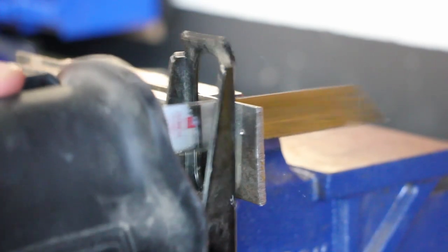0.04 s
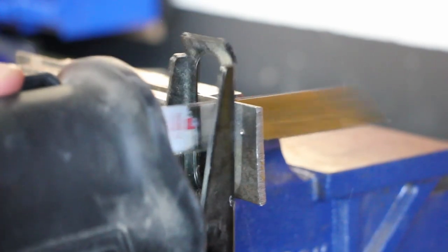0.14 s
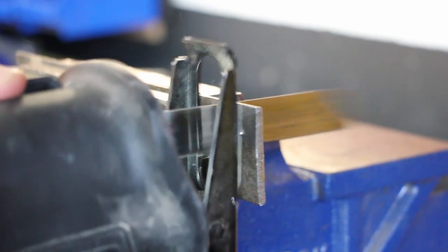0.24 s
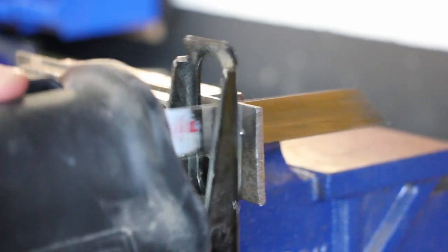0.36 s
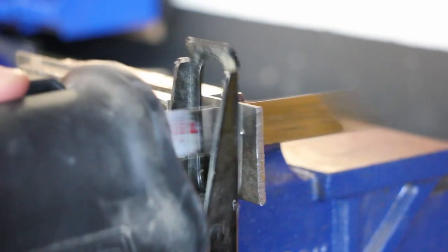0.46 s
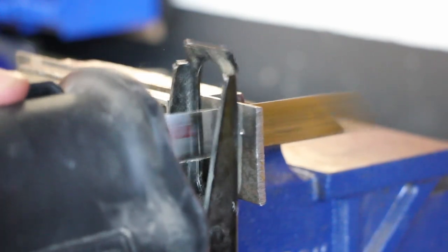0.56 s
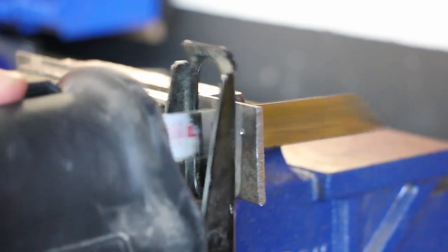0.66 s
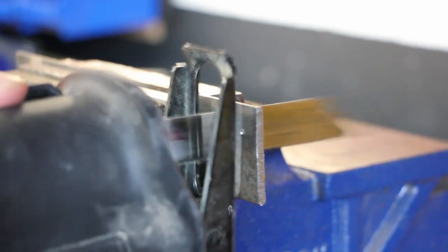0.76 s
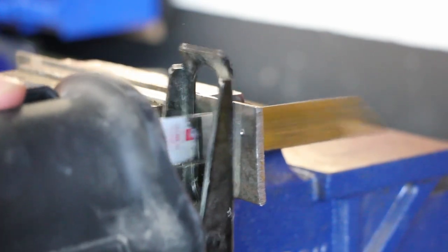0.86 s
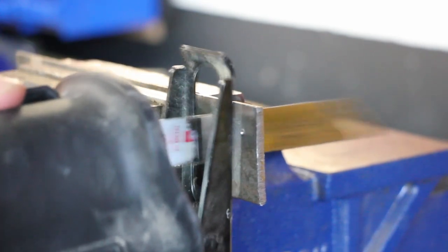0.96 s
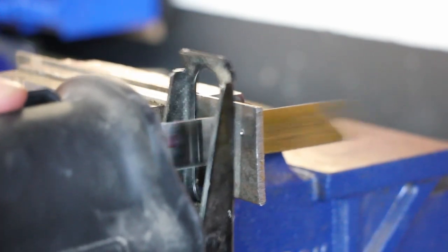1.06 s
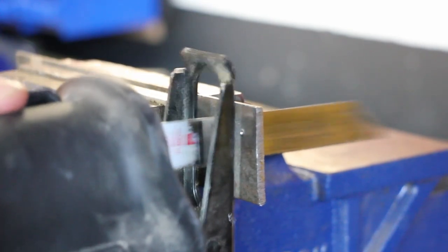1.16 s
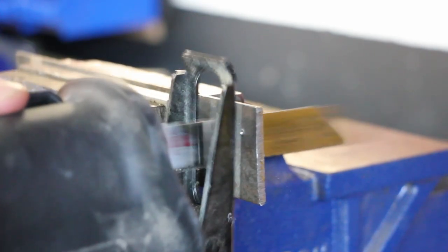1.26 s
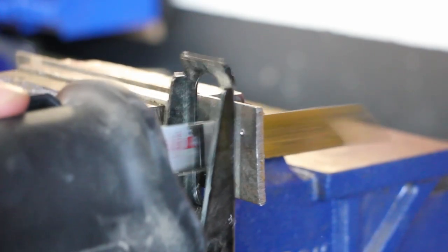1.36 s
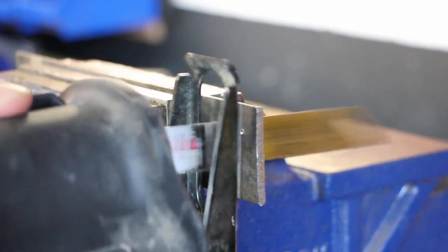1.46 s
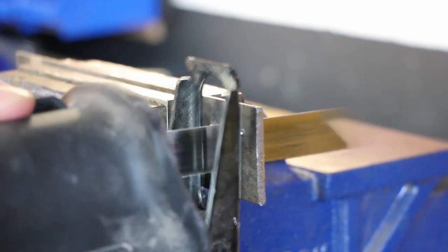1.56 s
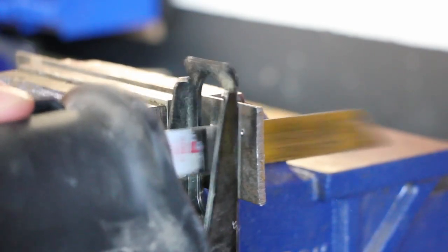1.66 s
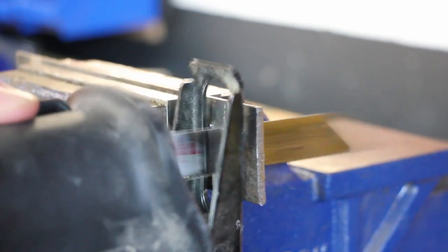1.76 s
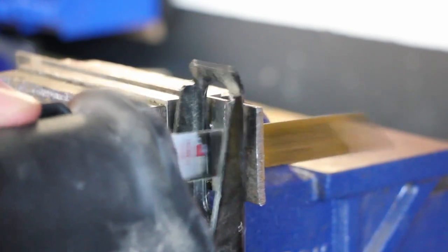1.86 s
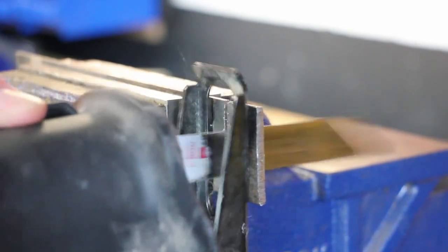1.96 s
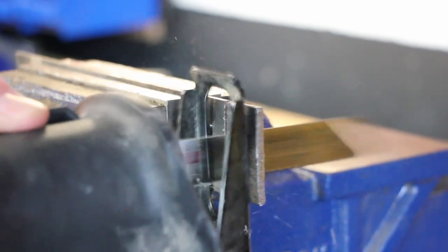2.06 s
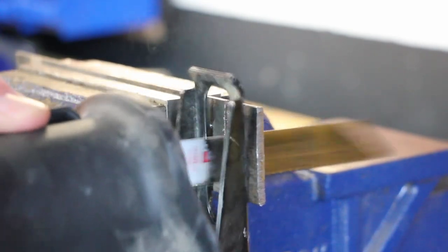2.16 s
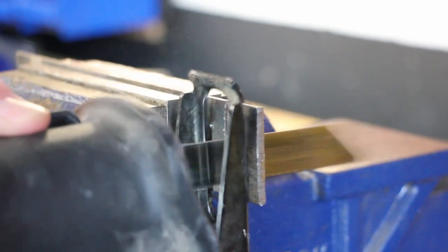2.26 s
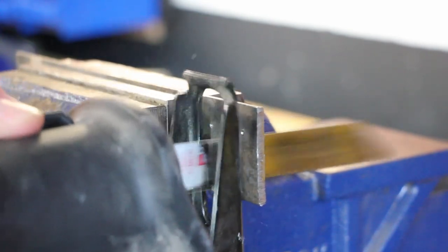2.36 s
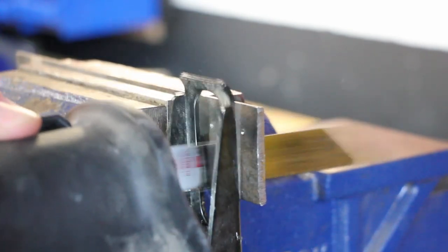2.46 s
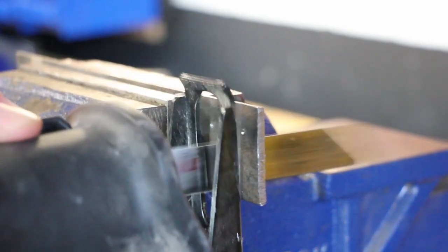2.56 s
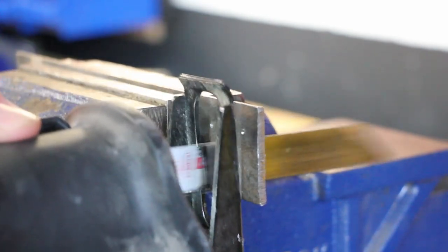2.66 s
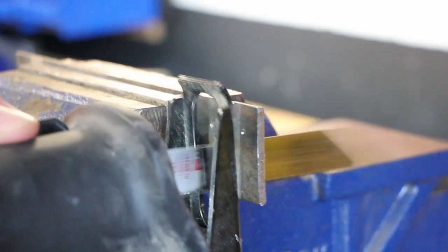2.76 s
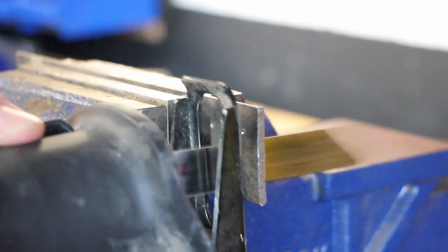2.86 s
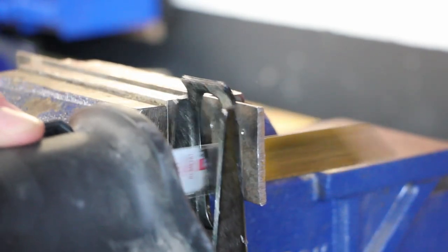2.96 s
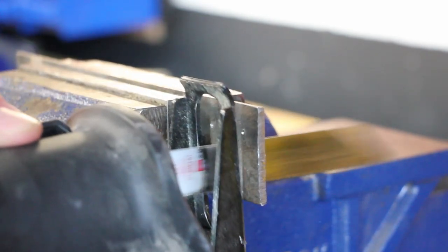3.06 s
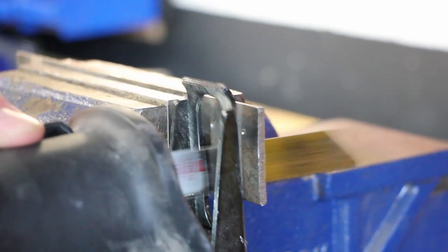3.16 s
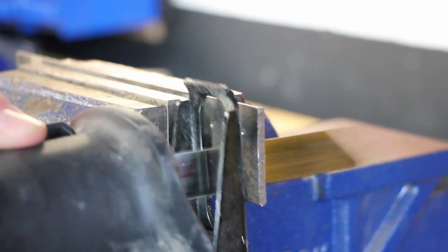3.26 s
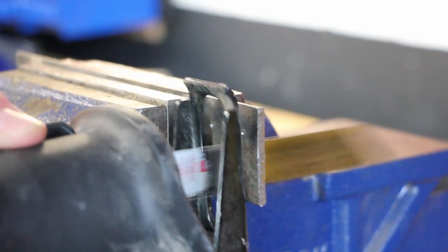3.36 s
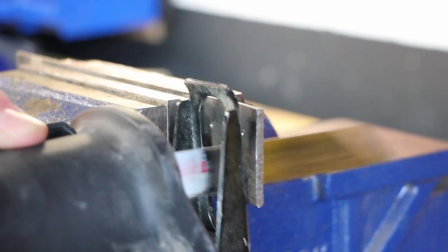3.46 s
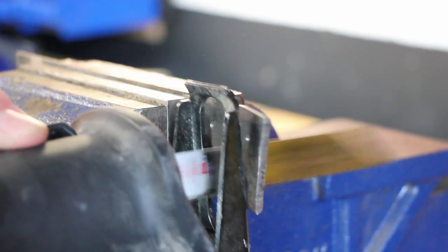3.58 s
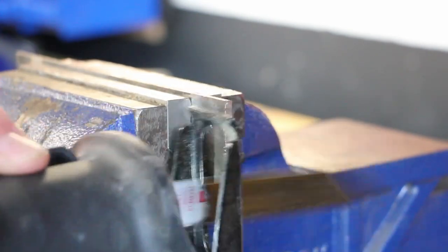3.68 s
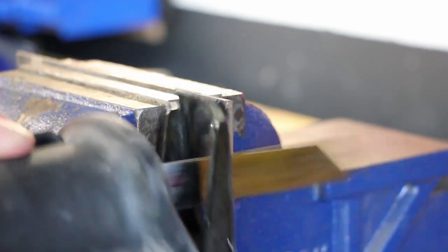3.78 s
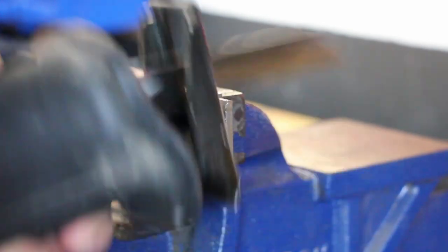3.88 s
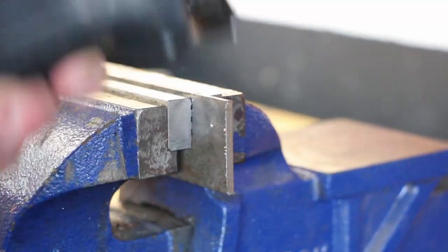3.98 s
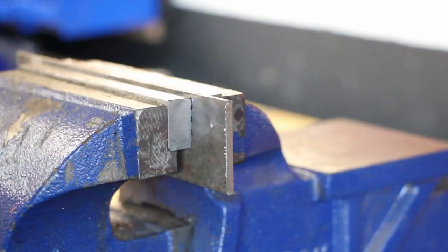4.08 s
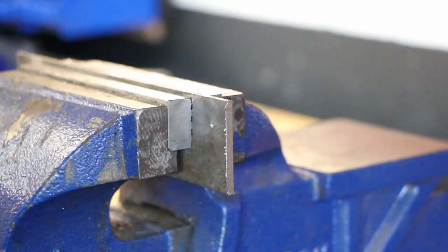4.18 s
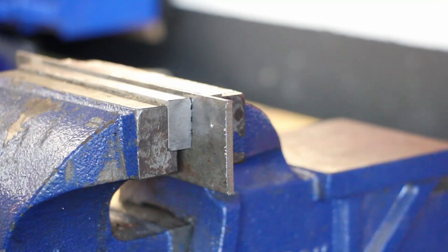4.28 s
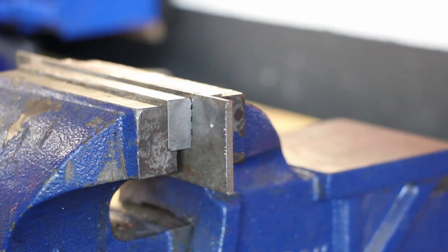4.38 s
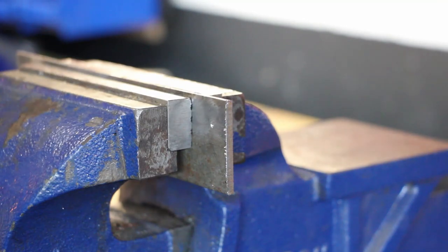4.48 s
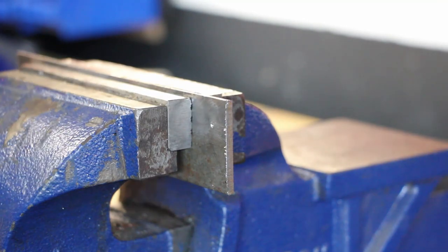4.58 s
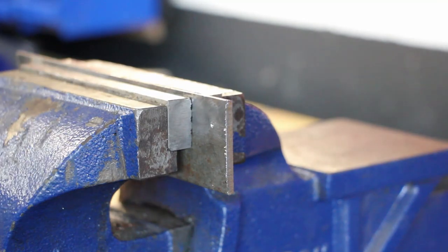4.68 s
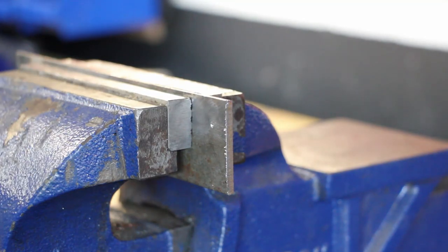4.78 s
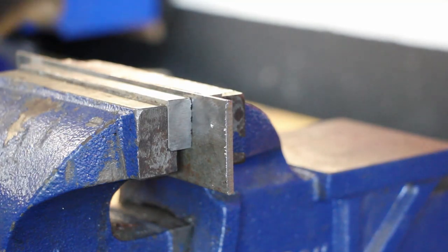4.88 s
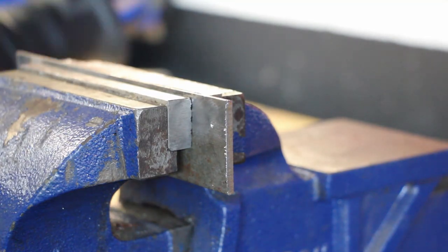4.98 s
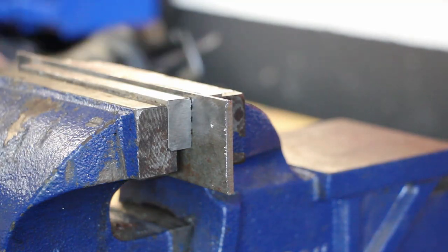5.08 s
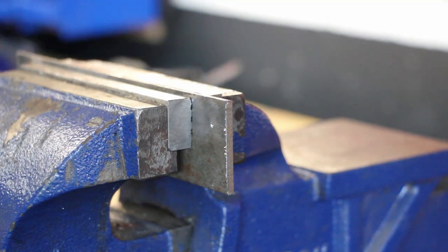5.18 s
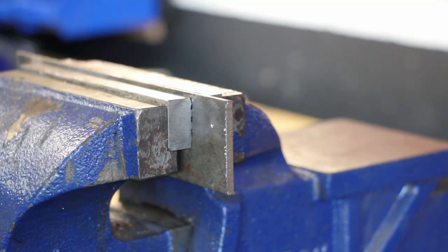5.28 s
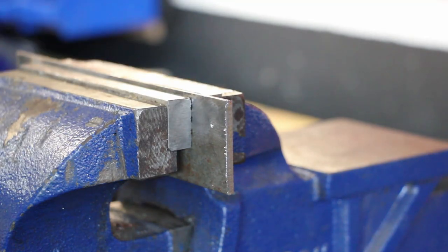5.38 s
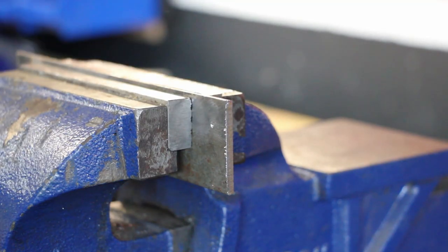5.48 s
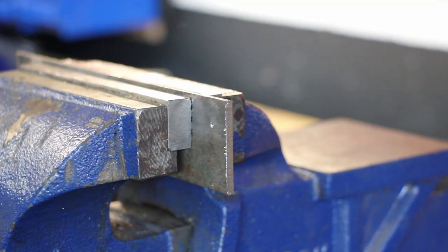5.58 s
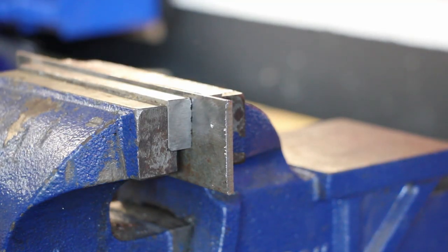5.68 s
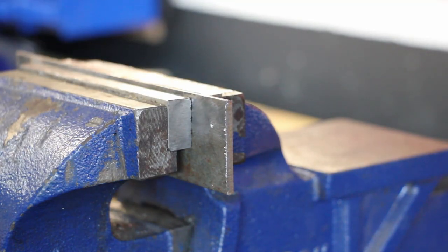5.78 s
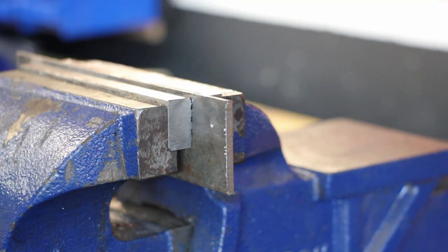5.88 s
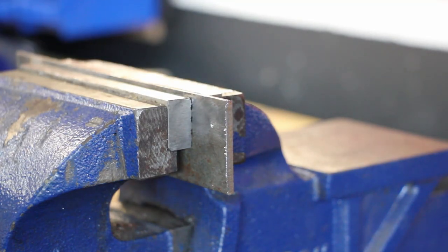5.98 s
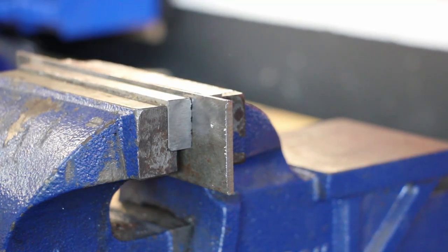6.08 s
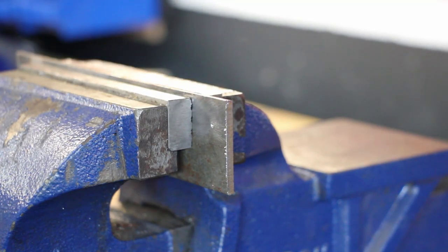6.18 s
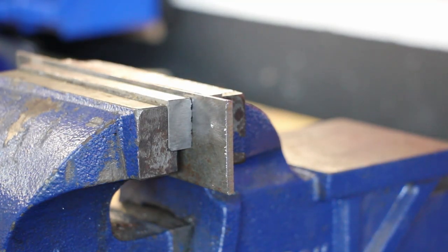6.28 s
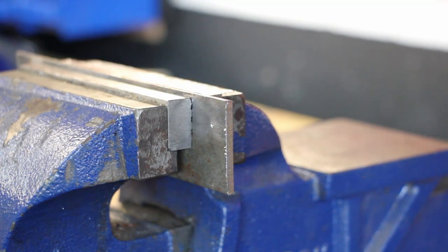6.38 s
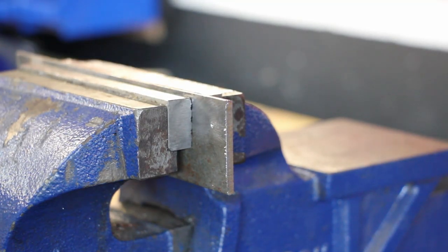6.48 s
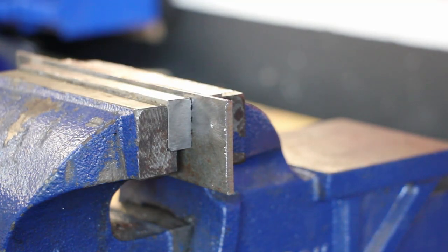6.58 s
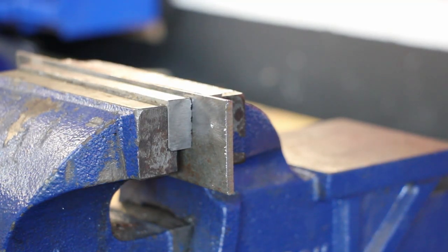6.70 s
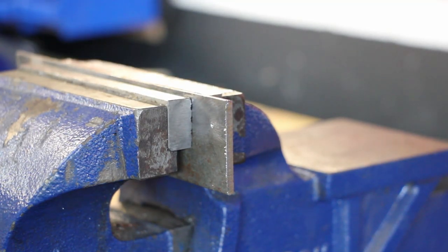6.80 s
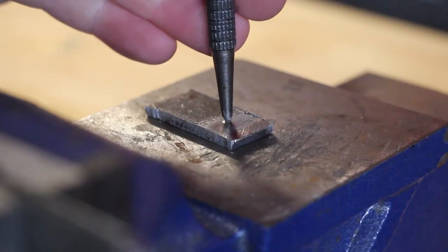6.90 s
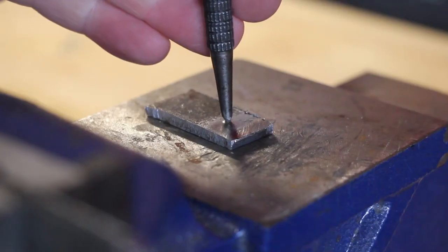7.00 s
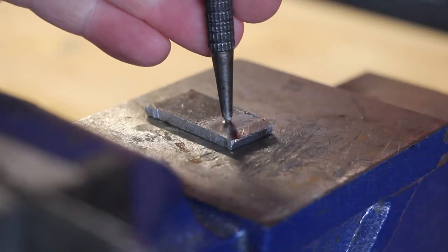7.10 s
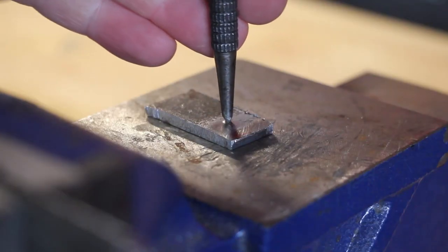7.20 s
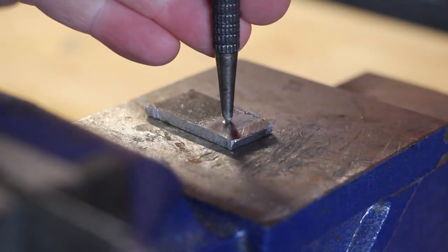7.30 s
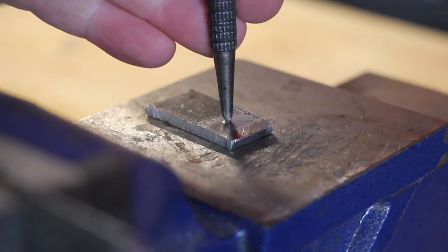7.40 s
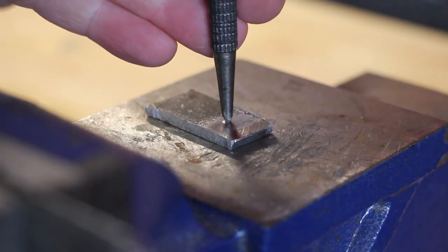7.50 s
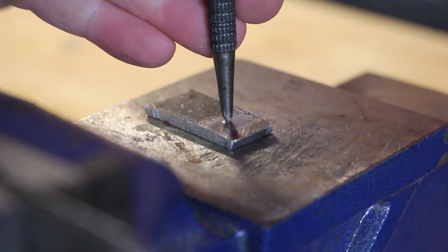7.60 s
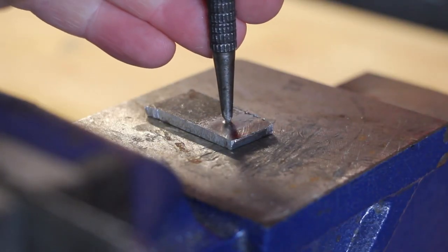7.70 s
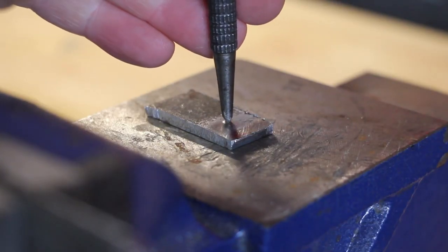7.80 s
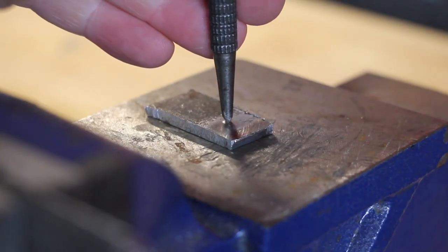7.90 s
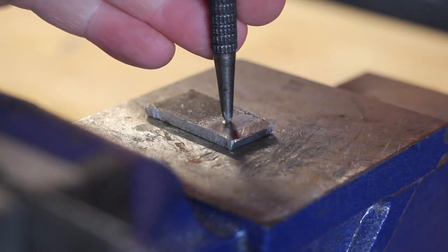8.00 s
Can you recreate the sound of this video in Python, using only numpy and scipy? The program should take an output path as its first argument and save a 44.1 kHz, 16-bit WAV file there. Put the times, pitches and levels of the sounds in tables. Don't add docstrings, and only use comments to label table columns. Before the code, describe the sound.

From 0 to about 3.7 seconds a reciprocating saw cuts steel in a vise, a dense, harsh roar pulsing around 36 strokes a second and flattened by microphone overload. Plate and jaw ring metallically, their pitches sagging as the cut deepens; thin squeaks chirp near 2 seconds and low bench shudder grows after it. Around 3.6 the offcut breaks free with high pings, then hits the floor at 4.2 with a bright clatter and small bounces. Meanwhile the motor coasts down, its gear whine falling through slowing crank clacks and raspy brushes until about 5.6. The tool meets the bench from 5.2 with thuds and a short singing ring; more thuds and scuffs follow at 6.05, 6.3 and 6.7. Garage air, faint hum and hiss come up, jumping at 6.85, as a drill press rattle grows until 8, with faint slides at 7.2 and 7.9.

```python
import sys
import numpy as np
from scipy import signal
from scipy.fft import rfft, irfft, next_fast_len
from scipy.io import wavfile
from scipy.ndimage import uniform_filter1d

SR = 44100
rng = np.random.default_rng(int(sys.argv[2]) if len(sys.argv) > 2 else 0)


def dump(signal):
    limited = np.clip(np.atleast_2d(signal).T, -1, 1)
    pcm = np.round(limited * 32767).astype(np.int16)
    wavfile.write(sys.argv[1], SR, pcm)


def makeup_ratio(level_db):
    decades = np.asarray(level_db, float) / 20
    return 10 ** decades


N = 355005
T = np.arange(N) / SR

# freq_hz, density_db
AIR_SPECTRUM = [(12, -32), (20, -2), (32, -14), (124, -16), (244, -25), (280, -24), (651, -31.5),
                (708, -29), (965, -28.5), (1170, -28), (1280, -33), (2000, -32.5), (15100, -52),
                (16500, -61)]
# time_s, level_db
AIR_LEVEL = [(5.6, -89), (5.8, -54.5), (6.11, -40), (6.45, -45), (6.71, -43.5), (7.77, -44.5),
             (8.05, -41.5)]
# freq_hz, width_hz, level_db
AIR_PEAK = (3500, 580, -20)
# freq_hz, level_db
HUM_TONES = [(59.2, -62), (118.4, -51), (721.4, -58)]
# freq_hz, width_hz, level_db
PRESS_MODES = [(373, 49, 3.5), (237, 36, -4.5), (1133, 27, -8), (1185, 39, -13), (1980, 47, -14),
               (2100, 60, -21), (3050, 150, -12.5), (3700, 110, -19)]
# time_s, level_db
PRESS_LEVEL = [(6.85, -60), (7.2, -52.5), (7.5, -43), (7.75, -43.5), (8.05, -38)]
# time_s, share_of_full
INPUT_GAIN = [(0, .02), (4.5, .02), (5.25, .06), (5.75, .22), (6.0, .36), (6.25, .44), (6.85, .46),
              (6.86, 1), (8.05, 1)]

# peak_s, level_db, rise_s, t60_s, tilt_db_per_octave
SCUFF_EVENTS = [
    (4.21, -13.5, 0.019, 0.15, 0),
    (4.245, -34, 0.0052, 0.088, 3),
    (6.055, -48, 0.043, 0.38, 2.5),
    (6.21, -41, 0.031, 0.18, -1),
    (6.34, -26, 0.047, 0.25, 0),
    (6.8, -48, 0.095, 0.24, 3.5),
    (7.19, -49, .03, .1, 3),
    (7.87, -39, 0.037, 0.25, -0.5),
    (7.916, -44, .001, .02, 6),
]
# freq_hz, density_db
SCUFF_SPECTRUM = [(120, -39), (200, -7), (241, -7), (459, -7), (741, -11.5), (1030, -5), (1390, -5),
                  (2160, -16.5), (3620, -4), (5440, -15.5), (14200, -24), (15600, -37), (16500, -47)]
# freq_hz, width_hz, level_db
LANDING_MODES = [(2174, 33, 7), (3700, 47, -0.5), (4310, 31, -3), (4750, 150, 0)]
# start_s, then level_db of the modes near 75, 140, 450, 1200 Hz
THUD_EVENTS = [(5.218, -26.5, -26, -26.5, -28), (5.305, -32, -34, -28, -34), (5.335, -32, -30, -40, -29),
               (5.441, -42.5, -41, -29.5, -40), (5.56, -44.5, -49, -25.5, -28),
               (6.05, -38, -28.5, -24.5, -30.5), (6.075, -41.5, -29, -29.5, -50),
               (6.335, -33, -33.5, -41, -40), (6.664, -26, -25.5, -22, -36.5), (6.74, -29.5, -35, -38, -52),
               (7.195, -37, -44, -59, -66)]
# freq_hz, t60_s
BENCH_MODES = [
    [(72, 0.34)],
    [(125, 0.14), (160, 0.12), (250, 0.11)],
    [(375, 0.072), (445, 0.11), (500, 0.13)],
    [(720, 0.072), (1150, 0.061), (1370, 0.066), (1820, 0.067), (2350, 0.037)],
]
# freq_hz, t60_s
OFFCUT_MODES = [(11620, 0.17), (11690, 0.17), (13790, 0.26), (13860, .15)]
# start_s, low_pair_db, high_pair_db
PING_EVENTS = [
    (3.585, -32, -45),
    (3.611, -26, -40),
    (3.628, -29, -22),
    (4.197, -32, -38),
    (4.241, -25, -42),
    (4.3, -34, -43),
    (4.47, -48, -55),
]
# start_s, level_db, pitch_hz
SQUEAK_EVENTS = [(1.95, -14, 12700), (2.004, -9, 12200), (2.032, -17, 12300), (2.063, -16, 12300),
                 (2.0904, -19, 12100), (2.1196, -16, 12400), (2.147, -11.5, 12200), (2.177, -22, 12500),
                 (2.2049, -14, 12400)]

# stroke_multiple, level_db
SHAKE_ORDERS = [(1, -74), (2, -46), (3, -48.5), (4, -63), (5, -52), (6, -44.5), (8, -50)]
# time_s, level_db
SHAKE_LEVEL = [(0, 4), (2.2, 8.5), (2.7, 17.5), (3.65, 18.5), (3.75, -28)]
# start_s, level_db
HEAVY_CLACKS = [(4.141, -11), (4.206, -4), (4.393, -18), (4.566, -16), (4.702, -14), (5.118, -21),
                (5.32, -13), (5.522, -22), (5.561, -19)]
# freq_hz, level_db, t60_s
HOUSING_MODES = [(1040, -13, 0.022), (1490, 2.5, 0.029), (1890, 4.5, 0.023), (2470, -5, 0.021),
                 (3520, 3, 0.013)]
# freq_hz, width_hz, level_db
BRUSH_MODES = [(6300, 440, -4), (7400, 460, 0), (8130, 500, 4), (9570, 500, 2), (11600, 600, -7),
               (13800, 1400, -22)]
# freq_hz, level_db
WHINE_RESPONSE = [(1200, -70), (2200, -47), (3100, -40.5), (3900, -29.5), (4300, -35.5), (4800, -31),
                  (6900, -34), (8000, -40)]
# mesh_multiple, level_db
GEAR_ORDERS = [(1, 6), (2.3, -9), (0.6, 0), (3, -14), (1.47, -7), (2.7, -9)]

# time_s, strokes_done
BLADE_STROKES = [(0, -0.42), (0.1, 3.23), (0.45, 15.91), (0.8, 28.63), (1.15, 41.25), (1.5, 53.75),
                 (1.85, 66.27), (2.2, 78.73), (2.55, 91.38), (2.9, 104.24), (3.25, 117.39), (3.6, 130.67)]
# start_s, end_s, first_hz, last_hz, level_db
TAB_MODES = [(0, 0.735, 990, 964, -25.5), (0.3, 1.8, 876, 860, -29), (1.7, 2.13, 845, 720, -32),
             (0.45, 1.52, 2086, 1840, -27), (1.4, 2.26, 1800, 1566, -25), (2.2, 2.7, 1390, 1373, -21.5),
             (2.6, 3.2, 1384, 1340, -26.5), (0, 1.6, 3700, 3600, -27.5), (1.45, 2.09, 3640, 3270, -20.5),
             (1.95, 2.595, 3080, 3000, -25.5), (2.43, 2.9, 2670, 2640, -25), (0, 0.67, 4620, 4540, -26.5),
             (0.5, 1.03, 4000, 4330, -29.5), (1.0, 1.82, 4620, 4560, -31), (0, 0.53, 5580, 5540, -28),
             (3.0, 3.66, 2430, 2360, -25.5), (2.88, 3.66, 3500, 3440, -27.5)]
# freq_hz, width_hz, level_db, start_s, end_s
JAW_MODES = [(1663, 32, -33, 0, 0.99), (1874, 46, -29.5, 0, 1.26), (2634, 49, -32.5, 0, 3.72),
             (3022, 72, -33, 0.054, 3.83), (3374, 41, -31, 0.59, 2.98)]
# time_s, level_db
SAW_LEVEL = [(0.0, -18.5), (1.47, -18.5), (2.19, -19), (2.35, -17.5), (2.99, -18.5), (3.59, -18.5),
             (3.66, -20), (3.78, -18.5), (4.03, -21.5), (4.21, -23.5), (4.4, -26), (4.6, -32),
             (5.16, -30.5), (5.3, -29), (5.6, -29.5), (5.88, -40), (6.0, -66), (6.03, -88)]
# freq_hz, density_db
CUTTING_SPECTRUM = [(15, -46), (25, -29), (100, -5.5), (251, -11), (348, -5), (433, -9.5), (1060, 0),
                    (1470, -2), (1640, 2), (2820, -4.5), (3600, 1), (4350, -3), (15200, -12.5),
                    (16500, -56)]
# freq_hz, density_db
COASTING_SPECTRUM = [(15, -68), (25, -40), (202, -14), (321, -8.5), (1180, 0), (1980, -4.5), (3700, -3),
                     (4350, -6.5), (5710, -8.5), (14000, -26.5), (15200, -33), (16500, -61)]
# freq_hz, density_db
STOPPING_SPECTRUM = [(15, -37), (25, -9), (76, -6), (186, -21), (288, -7), (496, -1), (599, -8),
                     (808, -2.5), (3500, -4), (13600, -20), (15200, -27), (16500, -49)]
# time_s, stage (0 cutting, 1 coasting, 2 stopping)
SAW_STAGE = [(0, 0), (3.62, 0), (3.72, 1), (4.2, 1), (4.7, 2)]

FREE_S, DOWN_S = 3.72, 5.215
MESH_HZ, RELEASE_S, DRAG_S, FRICTION_HZ_PER_S = 8000, 3.74, 0.95, 2450
MESH_PER_SHAFT, MESH_PER_REVERSAL, REVERSAL_LEAD = 24.4, 107, 0.255
CLACK_DB, CLACK_DB_PER_OCTAVE, CLACK_SPREAD_DB = -12.5, 4, 3
BRUSH_DB, BRUSH_RINGING_DB, BRUSH_SHARP, BRUSH_ODD = -42.5, -1.5, 0.54, 0.3
BRUSH_IN_S, BRUSH_FULL_S, BRUSH_OUT_S, BRUSH_RISE_DB, BRUSH_FALL_DB_PER_S = 4.3, 4.94, 5.5, 14, 60
WHINE_FROM_S, WHINE_DB_PER_OCTAVE = 3.3, 2.5
SHOE_HZ, SHOE_T60_S, SHOE_DB, SHOE_UNTIL_S = 522.7, 0.72, -4.5, 5.9
TAB_WIDTH_HZ, TAB_WIDTH_HZ_PER_KHZ, TAB_FADE = 37, 12, 0.35
BODY_DB, TREBLE_DB, TREBLE_DB_PER_OCTAVE = -3, -12.5, 8.5
BASS_DB, LIFTED_DB, BENCHED_DB, LIFTED_DB_PER_OCTAVE = -29, -32, -12, 6.5


def evened(x):
    return x / np.sqrt(np.mean(x ** 2) + 1e-20)


def curve(rows, t=T):
    s, *columns = np.transpose(rows)
    return [np.interp(t, s, c) for c in columns]


def read(points, hz):
    f, value = np.transpose(points)
    return np.interp(np.log(hz + 1), np.log(f + 1), value)


def add(mix, s, sound):
    part = mix[round(s * SR):][:len(sound)]
    part += sound[:len(part)]


def resonate(x, hz, width_hz):
    turn = np.exp(2j * np.pi * np.cumsum(hz * np.ones(len(x))) / SR)
    r = np.exp(-np.pi * width_hz / SR)
    return 2 * (turn * signal.lfilter([1 - r], [1, -r], x / turn)).real


def colour(x, points, tilt_db=0.):
    size = next_fast_len(len(x))
    hz = np.fft.rfftfreq(size, 1 / SR)
    gain = makeup_ratio(read(points, hz) + tilt_db * np.log2(hz / 2000 + 1e-3))
    return evened(irfft(rfft(x, size) * gain, size)[:len(x)])


def ring(hz, t60_s, t):
    return makeup_ratio(-60 * t / t60_s) * np.sin(2 * np.pi * hz * t)


def garage():
    still = rng.standard_normal(N)
    peak_hz, peak_width_hz, peak_db = AIR_PEAK
    air = colour(still, AIR_SPECTRUM) + makeup_ratio(peak_db) * evened(resonate(still, peak_hz, peak_width_hz))
    air = air * makeup_ratio(curve(AIR_LEVEL)[0])
    hum = sum(makeup_ratio(db + 2.5) * np.sin(2 * np.pi * hz * T) for hz, db in HUM_TONES)
    hum = hum * curve(INPUT_GAIN)[0] ** 2
    lumps = makeup_ratio(2.7 * evened(uniform_filter1d(rng.standard_normal(N), 1500)))
    rattle = rng.standard_normal(N) * lumps
    press = sum(makeup_ratio(db) * evened(resonate(rattle, hz, width_hz)) for hz, width_hz, db in PRESS_MODES)
    press_db = curve([(6.8, -100)] + PRESS_LEVEL)[0]
    return air + hum + makeup_ratio(press_db) * evened(press)


def walls(x):
    t = T[:SR // 3]
    hits = (rng.random(len(t)) < 2000 / SR) * rng.choice([-1., 1.], len(t))
    tail = hits * makeup_ratio(-60 * t / 0.29) * (t > 0.004)
    return signal.fftconvolve(x, tail / np.linalg.norm(tail))[:N]


def scuffs():
    out = np.zeros(N)
    for k, (s, db, rise_s, t60_s, tilt_db) in enumerate(SCUFF_EVENTS):
        t = T[:SR // 2] - rise_s
        grain_db = 21 * uniform_filter1d(rng.standard_normal(len(t)), 60)
        grit = rng.standard_normal(len(t)) * makeup_ratio(grain_db)
        sound = colour(grit, SCUFF_SPECTRUM, tilt_db)
        if k == 0:
            clatter = sum(makeup_ratio(d) * evened(resonate(grit, hz, 3 * w)) for hz, w, d in LANDING_MODES)
            sound = evened(0.6 * sound + clatter)
        swell = np.where(t < 0, (1 + t / rise_s) ** 2, makeup_ratio(-60 * t / t60_s))
        add(out, s - rise_s, makeup_ratio(db) * sound * swell)
    return out


def thuds():
    out, t = np.zeros(N), T[:SR // 2]
    for s, *group_db in THUD_EVENTS:
        sound = makeup_ratio(group_db[2] + SHOE_DB) * ring(SHOE_HZ, SHOE_T60_S, t) * (s < SHOE_UNTIL_S)
        for group, db in zip(BENCH_MODES, group_db):
            for hz, t60_s in group:
                sound = sound + makeup_ratio(db) * ring(hz * rng.uniform(0.94, 1.04), t60_s, t)
        add(out, s, sound * (1 - np.exp(-t / 0.0017)))
    return out


def pings():
    out, t = np.zeros(N), T[:SR // 2]
    for s, low_db, high_db in PING_EVENTS:
        modes_db = (low_db, low_db - 4, high_db, high_db - 8)
        add(out, s, sum(makeup_ratio(db) * ring(hz, t60_s, t) for (hz, t60_s), db in zip(OFFCUT_MODES, modes_db)))
    return out


def squeaks():
    out = np.zeros(N)
    for s, db, hz in SQUEAK_EVENTS:
        squeak = evened(resonate(rng.standard_normal(500), hz, 700)) * np.hanning(500)
        add(out, s, makeup_ratio(db - 4) * squeak)
    return out


def bench_shake():
    turn = 2 * np.pi * curve(BLADE_STROKES + [(3.8, BLADE_STROKES[-1][1] + 7.7)])[0]
    orders = sum(makeup_ratio(db - 14.5) * np.sin(k * turn + 6 * rng.random()) for k, db in SHAKE_ORDERS)
    return makeup_ratio(curve(SHAKE_LEVEL)[0]) * orders


def motor_hz():
    knee_hz = FRICTION_HZ_PER_S * DRAG_S
    knee_s = RELEASE_S + DRAG_S * np.log(MESH_HZ / knee_hz)
    dragged = MESH_HZ * np.exp(-np.maximum(T - RELEASE_S, 0) / DRAG_S)
    braked = np.maximum(knee_hz - FRICTION_HZ_PER_S * (T - knee_s), 1)
    return np.where(T < knee_s, dragged, braked)


def clacks():
    out, t, hz = np.zeros(N), T[:2000], motor_hz()
    done = np.cumsum(hz * (T > RELEASE_S)) / SR / MESH_PER_REVERSAL - REVERSAL_LEAD
    at = np.flatnonzero(np.diff(np.floor(done)))
    chance = rng.standard_normal((64, 2 * len(HOUSING_MODES) + 1))
    level_db = CLACK_DB + CLACK_DB_PER_OCTAVE * np.log2(hz[at] / MESH_HZ)
    level_db = level_db + CLACK_SPREAD_DB * chance[:len(at), -1]
    events = list(zip(T[at], level_db)) + HEAVY_CLACKS
    for (s, db), spread in zip(events, chance):
        body = np.zeros(len(t))
        for (f, d, t60_s), u, v in zip(HOUSING_MODES, spread[::2], spread[1::2]):
            body += makeup_ratio(d + 3.1 * u) * ring(f * (1 + 0.086 * v), t60_s, t)
        add(out, s, makeup_ratio(db - 13.5) * body)
    return signal.sosfilt(signal.butter(2, 500, "high", fs=SR, output="sos"), out)


def brushes():
    turn = 2 * np.pi * np.cumsum(motor_hz()) / SR / MESH_PER_SHAFT
    puffs = rng.standard_normal(N) * np.exp(BRUSH_SHARP * (np.cos(2 * turn) + BRUSH_ODD * np.cos(turn)))
    hiss = signal.sosfilt(signal.butter(2, 5000, "high", fs=SR, output="sos"), puffs)
    parts = sum(makeup_ratio(db) * evened(resonate(puffs, hz, width_hz)) for hz, width_hz, db in BRUSH_MODES)
    rise_db = np.interp(T, [BRUSH_IN_S - 0.1, BRUSH_IN_S, BRUSH_FULL_S], [-60, -BRUSH_RISE_DB, 0])
    fall_db = BRUSH_FALL_DB_PER_S * np.maximum(T - BRUSH_OUT_S, 0)
    rasp = evened(hiss) * makeup_ratio(-3.5) + makeup_ratio(BRUSH_RINGING_DB) * evened(parts)
    return makeup_ratio(BRUSH_DB + rise_db - fall_db) * rasp


def whine():
    hz = motor_hz()
    flutter = 1 + 0.3 * evened(uniform_filter1d(rng.standard_normal(N), 500))
    turn = 2 * np.pi * np.cumsum(hz) / SR
    tones = np.zeros(N)
    for k, db in GEAR_ORDERS:
        tones += makeup_ratio(db + read(WHINE_RESPONSE, k * hz)) * np.cos(k * turn) * (k * hz < 16000)
    return flutter * tones * makeup_ratio(WHINE_DB_PER_OCTAVE * np.log2(hz / MESH_HZ)) * (T > WHINE_FROM_S)


def bite(sharp):
    turn = 2 * np.pi * curve(BLADE_STROKES + [(3.7, BLADE_STROKES[-1][1] + 4.1)])[0]
    pressure = np.exp(sharp * (np.cos(turn) + 0.47 * np.cos(2 * turn)))
    return np.where(T < 3.7, pressure, 1)


def plate():
    blows = rng.standard_normal(N) * bite(0.63)
    out = np.zeros(N)
    for start_s, end_s, first_hz, last_hz, db in TAB_MODES:
        a, b = round(start_s * SR), round(end_s * SR)
        fade = signal.windows.tukey(b - a, TAB_FADE)
        if a == 0:
            fade[:b // 2] = 1
        width_hz = TAB_WIDTH_HZ + TAB_WIDTH_HZ_PER_KHZ * first_hz / 1000
        mode = resonate(blows[a:b], np.linspace(first_hz, last_hz, b - a), width_hz)
        out[a:b] += makeup_ratio(db) * evened(mode) * fade
    for hz, width_hz, db, start_s, end_s in JAW_MODES:
        a, b = round(start_s * SR), round(end_s * SR)
        mode = resonate(blows[a:b], hz, width_hz)
        out[a:b] += makeup_ratio(db) * evened(mode) * signal.windows.tukey(b - a, 0.3)
    return out


def saw_roar():
    hz, t, z = signal.stft(rng.standard_normal(N), SR, nperseg=1024)
    stage = curve(SAW_STAGE, t)[0]
    spectra = (CUTTING_SPECTRUM, COASTING_SPECTRUM, STOPPING_SPECTRUM)
    shapes = np.array([read(s, hz) for s in spectra])
    shares = np.clip(1 - abs(stage - np.arange(3)[:, None]), 0, 1)
    patches = uniform_filter1d(uniform_filter1d(rng.standard_normal(z.shape), 8, 0), 5, 1)
    lifted = (t > FREE_S) & (t < DOWN_S)
    thin_db = LIFTED_DB_PER_OCTAVE * np.outer(np.minimum(np.log2(hz / 300 + 1e-3), 0), lifted)
    field = makeup_ratio(shapes.T @ shares + thin_db)
    z = z * field * makeup_ratio(1.31 * evened(patches))
    treble_db = TREBLE_DB + TREBLE_DB_PER_OCTAVE * np.log2(motor_hz() / MESH_HZ)
    bass_db = np.where(T < FREE_S, BASS_DB, np.where(T < DOWN_S, LIFTED_DB, BENCHED_DB))
    treble = 1 / (1 + (5500 / (hz + 1)) ** 6)
    bass = 1 / (1 + (hz / 330) ** 6)
    # share, reference low_hz and high_hz, level_db, gate
    bands = [(1 - treble - bass, 400, 5000, BODY_DB, bite(0.074)),
             (treble, 7000, 11000, treble_db, bite(0.31)),
             (bass, 30, 300, bass_db, np.ones(N))]
    out = np.zeros(N)
    for share, low_hz, high_hz, db, gate in bands:
        level = np.sqrt((field[(hz > low_hz) & (hz < high_hz)] ** 2).sum(0) / len(hz))
        noise = signal.istft(z * share[:, None] / level, SR, nperseg=1024)[1][:N]
        out += noise * evened(gate) * makeup_ratio(db)
    return out * makeup_ratio(curve(SAW_LEVEL)[0])


def scene():
    hits = scuffs() + thuds() + pings() + squeaks() + clacks()
    saw = bench_shake() + brushes() + whine() + plate() + saw_roar()
    mono = garage() + hits + makeup_ratio(-5.5) * walls(hits) + saw
    return np.array([mono, mono])


def roll_off(x):
    return signal.sosfilt(signal.butter(12, 16610, fs=SR, output="sos"), x)


def record(dry):
    loud = makeup_ratio(1.82 * (T < 3.7)) * dry
    ceiling = 0.21
    clipped = loud / (1 + abs(loud / ceiling) ** 8) ** (1 / 8)
    gain = curve(INPUT_GAIN)[0]
    hiss = makeup_ratio(-51.5) * rng.standard_normal(dry.shape)
    offset = np.array([[-0.0165], [-0.0185]])
    return roll_off(clipped + gain * (hiss + offset))


dry = scene()
out = record(dry)
dump(out)
```